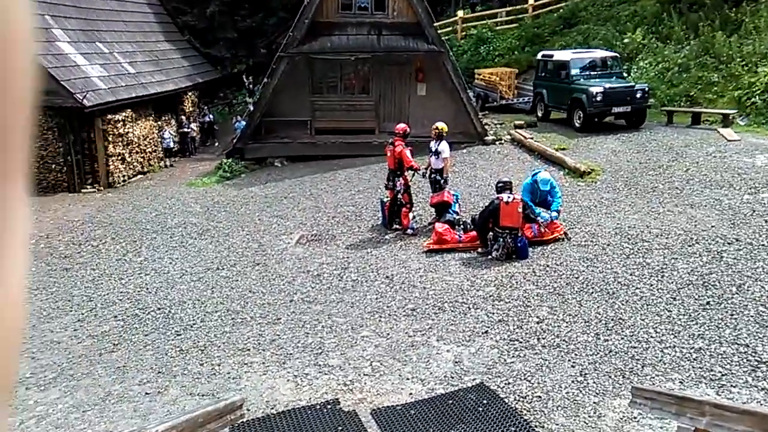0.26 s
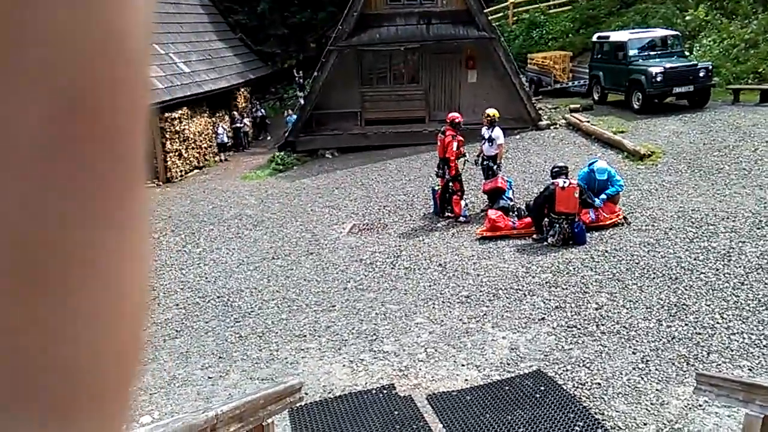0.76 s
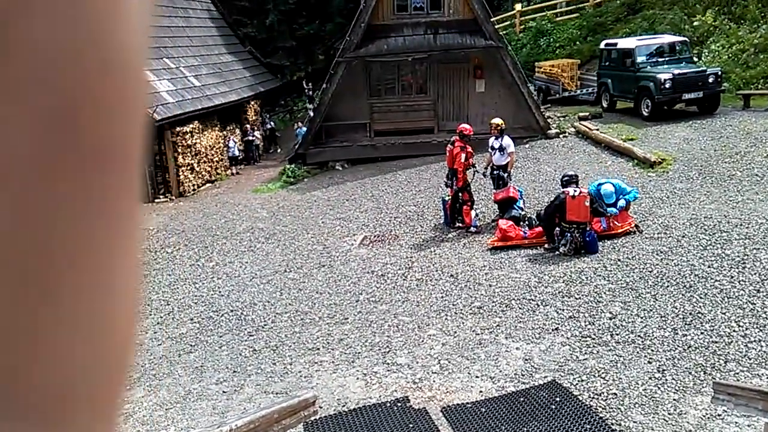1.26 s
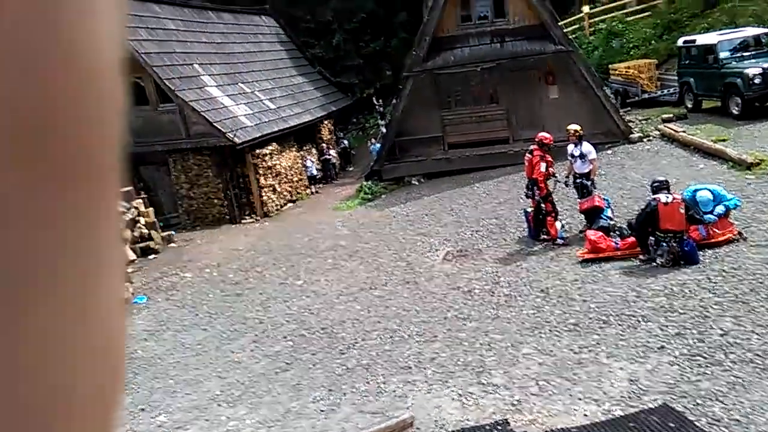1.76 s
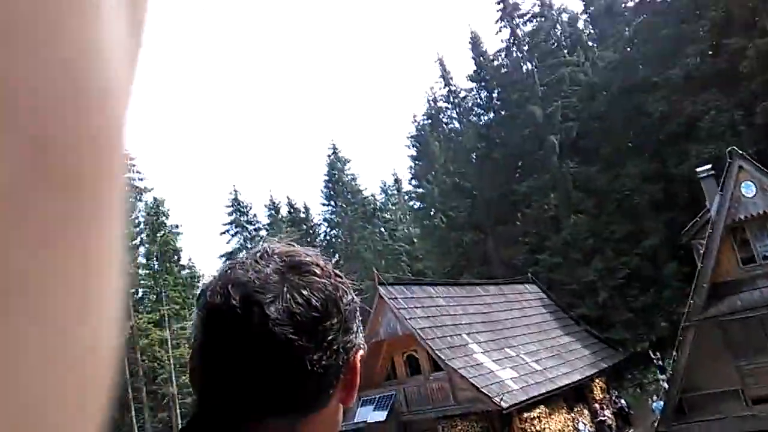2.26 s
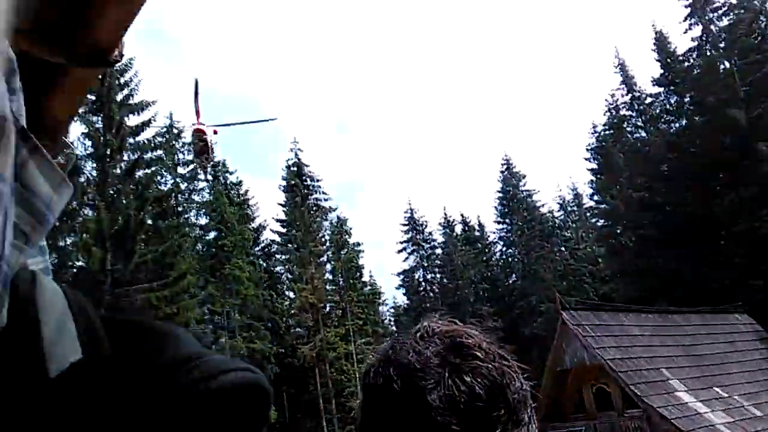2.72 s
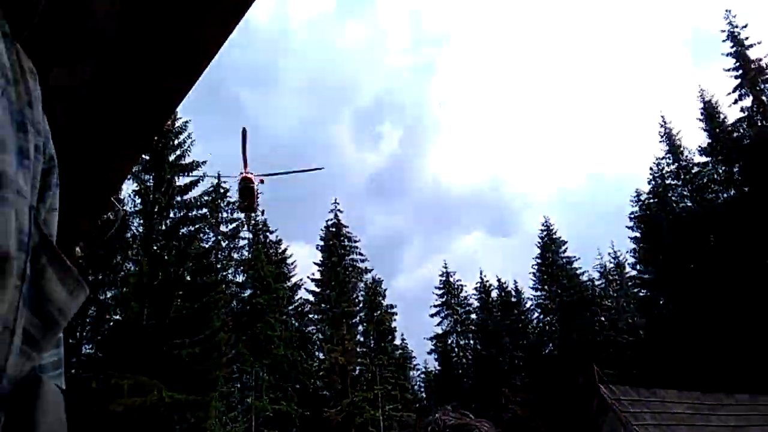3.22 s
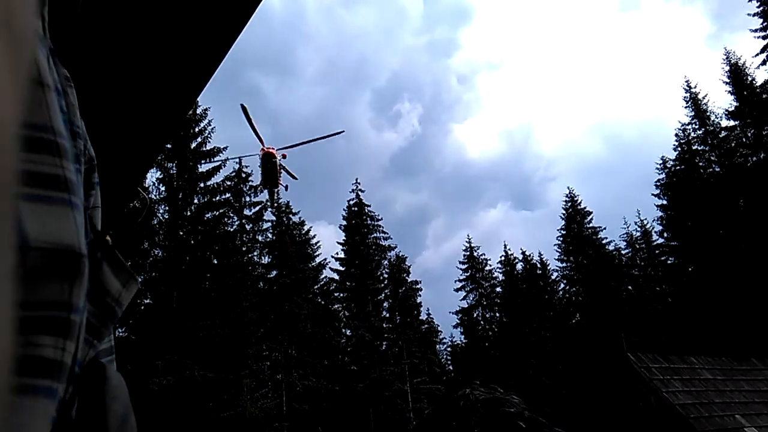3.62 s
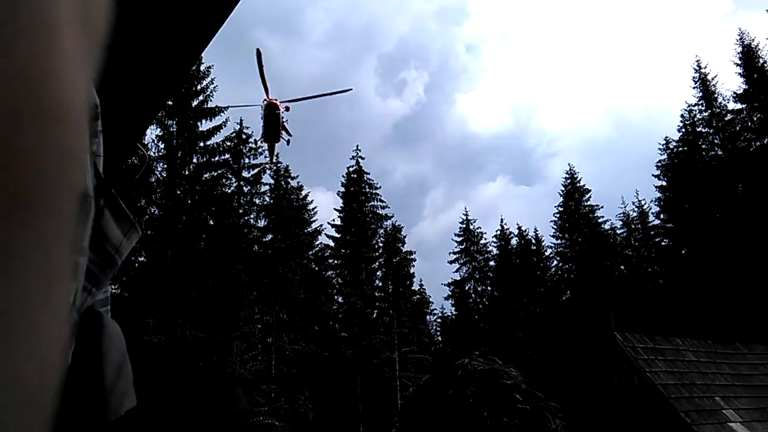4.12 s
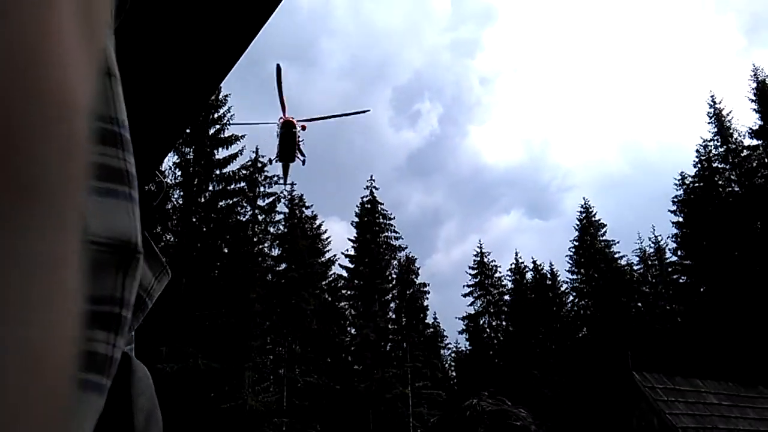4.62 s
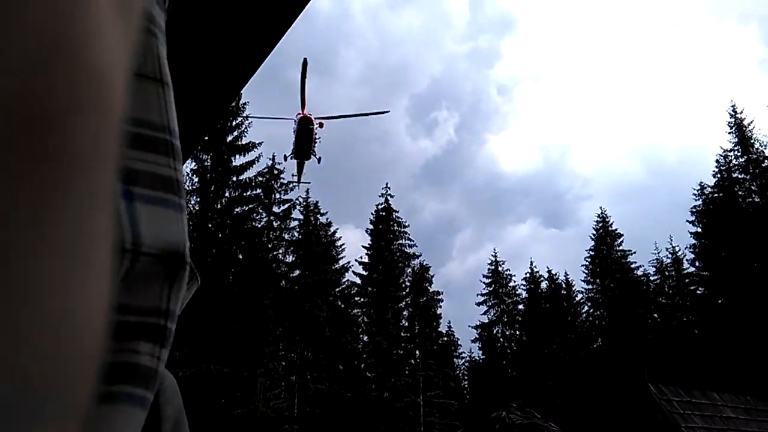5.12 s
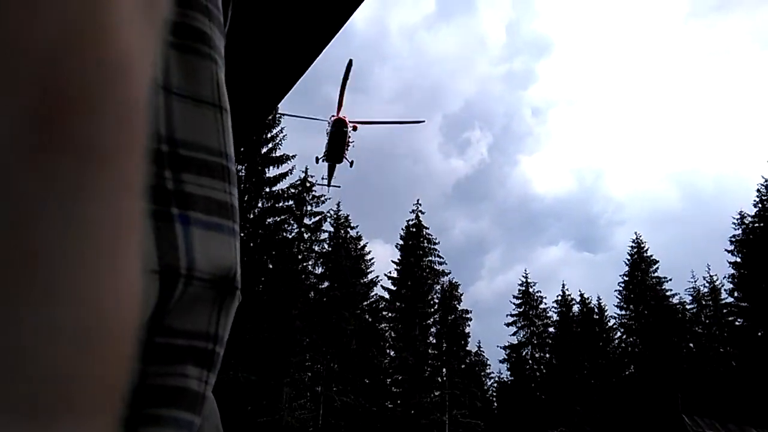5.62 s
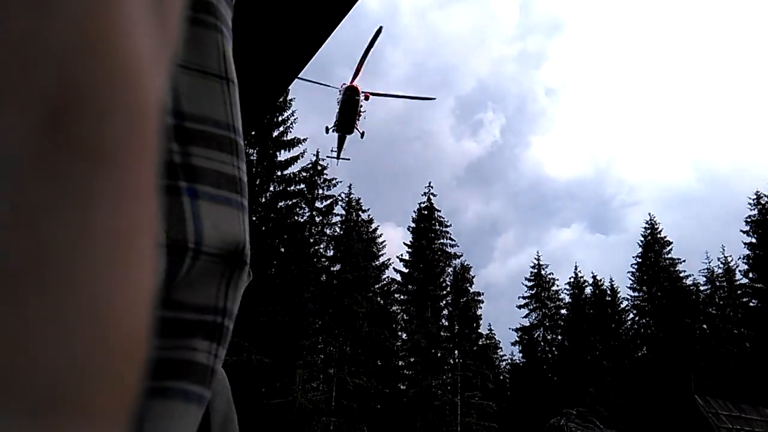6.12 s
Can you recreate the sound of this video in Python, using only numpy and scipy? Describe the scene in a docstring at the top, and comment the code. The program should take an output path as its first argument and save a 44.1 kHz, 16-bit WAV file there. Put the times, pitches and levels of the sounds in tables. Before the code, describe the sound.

A hovering helicopter heard through partly covered handheld microphones. At first the sound is dull and boomy, with stuttering dropouts and soft thumps on the right. Around three seconds a finger slips off and the left side opens abruptly into full roar, rapid chopping swishes and whistling whine. It grows as the aircraft approaches, partly muffled again by pressing fingers, with a sharp skin creak near the end.

```python
"""Forest clearing: a helicopter hangs back, then moves in; rotor drone, swishing and slapping blades, whine.
Rotors are harmonic sines, blade turbulence and slap are pulsed noise, gears and turbine are narrow tones.
Fingers partly cover two hand-held microphones, as filters that change with time: the left is sealed at
first and then bursts open; the right is squeezed and cuts out in short, thumping gaps. Fingers creak."""
import sys
import numpy as np
from scipy import signal
from scipy.fft import rfft, irfft
from scipy.io import wavfile
from scipy.ndimage import uniform_filter1d, minimum_filter1d

SR = 44100
rng = np.random.default_rng(int(sys.argv[2]) if len(sys.argv) > 2 else 0)


def store_wav(level_fs):
    """Save 16-bit WAV to argv[1]."""
    pcm = np.round(np.clip(np.atleast_2d(level_fs), -1, 1) * 32767)
    wavfile.write(sys.argv[1], SR, pcm.T.astype(np.int16))


N = 280917
TIME, BINS = np.arange(N) / SR, np.fft.rfftfreq(N, 1 / SR)


def gain_of(db):
    """Decibels to amplitude."""
    return 10 ** (np.asarray(db) / 20)


def evened(x):
    """Scales to an rms of 1."""
    return x / np.sqrt(np.mean(x ** 2) + 1e-20)


def over_time(rows, t=TIME):
    """Each column of a curve table at the times t."""
    s, *columns = np.transpose(rows)
    return [np.interp(t, s, c) for c in columns]


def over_pitch(rows, hz=BINS):
    """Each column of a spectrum table, on a log-frequency axis."""
    f, *columns = np.transpose(rows)
    return [np.interp(np.log(hz + 1), np.log(f + 1), c) for c in columns]


def noise(shape):
    """Noise of rms 1 with the given magnitude spectrum."""
    return evened(irfft(rfft(rng.standard_normal(N)) * shape, N))


def drift(rate_hz):
    """Slow random curve of rms 1, Gaussian low-pass at rate_hz."""
    return noise(np.exp(-.5 * (BINS / rate_hz) ** 2))


def band(hz, half_width_hz):
    """Narrow-band noise: a fuzzy whistle."""
    return noise(1 / (1 + ((BINS - hz) / half_width_hz) ** 2))


def ramp(t, start_s, length_s):
    """Raised-cosine step from 0 to 1."""
    return .5 - .5 * np.cos(np.pi * np.clip((t - start_s) / length_s, 0, 1))


# main blade passing rate: (time [s], rate [passes/s])
MAIN_BLADE_RATE = [(0, 18.09), (1, 18.16), (2.6, 18.16), (3.6, 18.10), (4.6, 18.12), (5.4, 18.01),
                   (6.37, 17.88)]


def blade_rate_hz():
    """Main blade passes per second."""
    return over_time(MAIN_BLADE_RATE)[0]


def blade_pulse(turns, rise, fall, spread_db):
    """A swell at each blade pass, each of its own strength; rise and fall in blade periods."""
    blade, since = (turns // 1).astype(int), turns % 1
    size = gain_of(spread_db * rng.standard_normal(256))
    decay = size[blade] * np.exp(-since / fall)
    onset = size[blade + 1] * np.exp((since - 1) / rise)
    return evened(decay + onset)


# skin slips on plastic, left microphone: (time [s], peak level [dB])
CREAK_TIMES = [(2.279, -44.5), (2.859, -39), (6.036, -4), (6.094, -15)]


def creaks(decay_s=0.01):
    """Skin slipping on plastic: brief bright scratches, sudden onset, exponential decay."""
    envelope = sum(gain_of(db) * (TIME >= s) * np.exp(-abs(TIME - s) / decay_s) for s, db in CREAK_TIMES)
    scratch = noise(BINS / (BINS ** 2 + 3500 ** 2))
    return envelope * scratch / abs(scratch).max()


# colour of blade turbulence: (frequency [Hz], relative density [dB per Hz])
ROAR_COLOUR = [(25.0, -9), (50.0, -63), (105.0, -12), (180.0, -2), (260.0, -7), (470.0, 1.5), (680.0, -6),
               (1100.0, -7.5), (1500.0, -13.5), (2000.0, -11), (2600.0, -16.5), (3300.0, -18.5),
               (3900.0, -27.5), (6800.0, -39.5), (10200.0, -43), (11100.0, -37.5), (12500.0, -47),
               (14200.0, -49)]
# part of the roar that comes in swishes: (frequency [Hz], share of power [0-1])
SWISH_SHARE = [(100, 0), (450, 0.25), (1000, 0.53), (1900, 0.57), (3000, 0.59), (6000, 0.7), (11000, 0.1)]
ROAR_DB = -10


def roar(swish, grain_db=2.5, echo=0.23):
    """Steady turbulence plus a gritty swish per blade; a shifting ground echo ripples the colour."""
    high_pass = BINS ** 2 / (BINS ** 2 + 20 ** 2)
    colour = gain_of(over_pitch(ROAR_COLOUR)[0]) * high_pass
    share = np.clip(over_pitch(SWISH_SHARE)[0], 0, 1)
    bursts = evened(swish * gain_of(grain_db * drift(320)) * rng.standard_normal(N))
    steady = rng.standard_normal(N)
    air = irfft(colour * (np.sqrt(share) * rfft(bursts) + np.sqrt(1 - share) * rfft(steady)), N)
    delay_s = .0105 + 0.000488 * drift(0.643)
    return gain_of(ROAR_DB) * evened(air + echo * np.interp(TIME - delay_s, TIME, air))


# gears and compressor: (frequency [Hz], full width at half amplitude [Hz], level [dB])
GEAR_WHINES = [(1000, 22, -34), (1922, 33, -34.5), (4200, 60, -47), (11070, 130, -48)]


def gear_whine():
    """Gears and compressor: steady narrow noise bands."""
    return sum(gain_of(db) * band(hz, width_hz / 2) for hz, width_hz, db in GEAR_WHINES)


# the whistle beams past once as the aircraft turns
WHISTLE_BEAM_DB, WHISTLE_BEAM_S, WHISTLE_WIDTH_S = 7, 3.88, 0.93
OVERHEAD_S, OVERHEAD_DB_PER_S = 4.6, 1


def whistle_beam_db():
    """Rise of the whistle as its beam passes, a Gaussian in time."""
    return WHISTLE_BEAM_DB * np.exp(-((TIME - WHISTLE_BEAM_S) / WHISTLE_WIDTH_S) ** 2)


def body_shadow():
    """Coming overhead, the body hides the turbine tone and the whistle."""
    return gain_of(-OVERHEAD_DB_PER_S * np.maximum(TIME - OVERHEAD_S, 0))


# the turbine beams at the listener at first, then turns away
TURBINE_DB, TURBINE_BEAM_DB, TURBINE_TURN_S = -34.5, 13.5, 0.35
TURBINE_SHARE = 0.46  # of the whistle's beaming


def turbine(tone_hz=2853, wander_hz=7):
    """Turbine: one sine whose pitch wanders slightly."""
    db = TURBINE_DB + TURBINE_BEAM_DB * np.exp(-TIME / TURBINE_TURN_S) + TURBINE_SHARE * whistle_beam_db()
    phase = 2 * np.pi * np.cumsum(tone_hz + wander_hz * drift(13.8)) / SR
    return body_shadow() * gain_of(db) * np.sqrt(2) * np.sin(phase)


# the octave swells once, around 3 s
WHISTLE_DB, OCTAVE_DB = -34, -53
OCTAVE_SWELL_DB, OCTAVE_SWELL_S, OCTAVE_SWELL_WIDTH_S = 13, 3.07, 0.45


def blade_whistle(turns, whistle_hz=3050, jitter_hz=45, glide_hz=300):
    """Whistle on the blades with its octave; Doppler chirps it downward as each blade swings past."""
    octave_db = OCTAVE_DB + OCTAVE_SWELL_DB * np.exp(-((TIME - OCTAVE_SWELL_S) / OCTAVE_SWELL_WIDTH_S) ** 2)
    ahead = turns + .25  # chirp leads the swish
    chirp = blade_pulse(ahead, rise=0.021, fall=0.099, spread_db=2.5)
    doppler_hz = -glide_hz * ((ahead + .5) % 1 - .5)
    phase = 2 * np.pi * np.cumsum(whistle_hz + doppler_hz + jitter_hz * drift(64.0)) / SR
    whistle = gain_of(WHISTLE_DB + whistle_beam_db()) * np.sin(phase)
    octave = gain_of(octave_db) * np.sin(2 * phase)
    return body_shadow() * np.sqrt(2) * chirp * (whistle + octave)


# blade slap, strongest while the aircraft is behind the trees: (time [s], level [dB])
SLAP_LEVEL = [(0, -17), (.5, -15), (.85, -11), (1.8, -15.5), (3.3, -16), (3.45, -21), (4.8, -21.5),
              (5.1, -18.5), (6.37, -26.5)]
# humps in the colour of a slap: (frequency [Hz], relative level [dB])
SLAP_COLOUR = [(900, 1.5), (1220, 2), (1500, -3), (1820, 0), (2080, -3), (2500, -5)]


def slap(turns, half_width_hz=100, spread_db=4.5):
    """A knock as each blade meets the wake of the one before; humps vary singly, so colours differ."""
    def hump(hz, db):
        knock = blade_pulse(turns, rise=0.057, fall=0.17, spread_db=spread_db)
        return gain_of(db) * knock * band(hz, half_width_hz)
    return gain_of(over_time(SLAP_LEVEL)[0]) * evened(sum(hump(hz, db) for hz, db in SLAP_COLOUR))


# the ground echo lags more as the aircraft climbs in the sky
ECHO_S, ECHO_GROWTH_S_PER_S, ECHO_STRENGTH = 0.00625, .00064, 0.56
TAIL_RATIO = 3.944  # tail blade passes per main blade pass


def echo_delay_s():
    """Time by which the ground echo trails the direct sound."""
    return ECHO_S + ECHO_GROWTH_S_PER_S * TIME


# lowest tail rotor harmonics: (multiple [1], level before echo and beam [dB], share of beaming [1])
TAIL_LOW = [(1, -16.5, 1.15), (2, -20.5, 1.57), (3, -19, .15)]
# wavering tail rotor overtones: (multiple [1], level before beam [dB])
TAIL_HIGH = [(4, -30.5), (5, -30), (6, -28.5), (7, -24.5), (8, -37.5), (9, -42), (10, -47)]
# main rotor beat: (multiple [1], level [dB])
MAIN_HARMONICS = [(2, -42), (3, -36), (5, -39), (6, -35.5), (10, -39)]
# tail rotor beams toward and away as the aircraft turns: (time [s], level change [dB])
TAIL_BEAMING = [(.3, 5), (.6, 1), (2.5, -0.5), (3.6, 1), (5.3, -2.5), (6.0, -6)]
OVERTONE_SHARE = .6  # of the tail rotor's positive beaming


def drone(turns, waver_db=0.85, fade_db=2.0, wander_rad=1.0):
    """Rotor harmonics; ground echo combs the lowest, moving air makes higher ones fade and wander."""
    def partial(multiple, db, unrest_db):
        wander = wander_rad * unrest_db / fade_db * drift(3.35)
        phase = 2 * np.pi * (multiple * turns + rng.random()) + wander
        return np.sqrt(2) * gain_of(db + unrest_db * drift(3.9)) * np.sin(phase)

    def comb(k):
        return abs(1 + ECHO_STRENGTH * np.exp(1j * k * lag_rad))

    lag_rad = 2 * np.pi * TAIL_RATIO * blade_rate_hz() * echo_delay_s()
    beam_db = over_time(TAIL_BEAMING)[0]
    overtone_beam_db = OVERTONE_SHARE * np.maximum(beam_db, 0)
    low = sum(comb(round(k)) * partial(TAIL_RATIO * round(k), db + share * beam_db, waver_db)
              for k, db, share in TAIL_LOW)
    high = sum(partial(TAIL_RATIO * round(k), db + overtone_beam_db, fade_db) for k, db in TAIL_HIGH)
    beat = sum(partial(round(k), db, 2 * waver_db) for k, db in MAIN_HARMONICS)
    return low + high + beat


def covered(x, colour_db):
    """Time-varying filter: colour_db(Hz column, s row)."""
    hz, t, z = signal.stft(x, SR, nperseg=1024, noverlap=768)
    return signal.istft(z * gain_of(colour_db(hz[:, None], t)), SR, nperseg=1024, noverlap=768)[1][:N]


def press(t, start_s, closing_s, lets_go_s, easing_s):
    """A finger closes, holds and eases off: 0-1."""
    return ramp(t, start_s, closing_s) * (1 - ramp(t, lets_go_s, easing_s))


def pocket(rows, hz, t, half_width_hz):
    """Moving resonance of the air under a finger: 1 at its centre."""
    return 1 / (1 + ((hz - over_time(rows, t)[0]) / half_width_hz) ** 2)


# colour of covered ports:
# (frequency [Hz], left sealed [dB], left half covered at depth 1 [dB], right before grip [dB])
COVER_COLOUR = [(75, -22, 0, -6.5), (140, -27, -1, -15.5), (218, -34.5, -5, -18), (387, -39.5, -7, -21),
                (693, -41, -13, -29.5), (1155, -37.5, -17.5, -37.5), (1920, -44.5, -22.5, -38),
                (3200, -43, -26.5, -34.5), (5100, -43, -22.5, -26.5), (8000, -30.5, -18.5, -28),
                (11700, -22.5, -9, -29), (13900, -31, -13, -30)]
# left finger; presses add up, depth below 0 lifts clear:
# (start [s], closing [s], lets go [s], easing [s], depth [x half covered colour], gain [dB])
LEFT_FINGER = [(3.2, .1, 3.323, 0.19, 0.99, 3.5), (3.44, 0.18, 3.64, 0.14, -0.33, -5),
               (4.42, 0.11, 4.6, .15, -0.22, 6), (4.798, 0.079, 5.65, 0.45, 0.96, 0.4),
               (4.8, 0.07, 5.13, 0.23, 0.13, -0.9), (4.98, 0.094, 5.13, 0.15, 0.02, -5),
               (5.53, 0.11, 5.51, 0.16, 0.24, -5.5)]
# air pocket under the left finger, shifts with the grip: (time [s], resonance [Hz])
LEFT_RESONANCE = [(.9, 1250), (1.4, 1730), (2.0, 1780), (2.75, 1480), (3.3, 1260)]
# the seal leaks before it slips: (frequency [Hz], level change [dB])
SEAL_LEAK = [(200, -0.5), (420, 6.5), (900, -3), (3000, 1), (5500, -4.5)]
LEAK_S, LEAK_LENGTH_S = 1.88, 0.64
SLIP_S, SLIP_LENGTH_S = 3.335, 0.046
LEFT_POCKET_DB = 8.5


def left_cover(hz, t):
    """The finger seals the left port, leaks, slips off, then covers it in part by several presses."""
    sealed_db, half_db, _ = over_pitch(COVER_COLOUR, hz)
    free = ramp(t, SLIP_S, SLIP_LENGTH_S)
    pressed_db = sum(press(t, *timing) * (depth * half_db + db) for *timing, depth, db in LEFT_FINGER)
    leak_db = ramp(t, LEAK_S, LEAK_LENGTH_S) * over_pitch(SEAL_LEAK, hz)[0]
    pocket_db = LEFT_POCKET_DB * pocket(LEFT_RESONANCE, hz, t, half_width_hz=57)
    return (1 - free) * (sealed_db + leak_db + pocket_db) + free * pressed_db


# hand on the right port, loss below 0 loosens:
# (start [s], closing [s], lets go [s], easing [s], middle band loss [dB])
RIGHT_HAND = [(0.222, 0.59, 1.894, 1.22, 34), (3.0, 0.91, 3.58, 0.1, -3.5), (3.58, 0.092, 4.42, 0.5, 6)]
# air pocket under the right finger, shifts with the grip: (time [s], resonance [Hz])
RIGHT_RESONANCE = [(.4, 750), (.8, 1140), (1.5, 1196), (1.95, 1560), (2.85, 1430), (6.37, 1710)]
LOOSE_DB, CREEP_DB_PER_S = 5.5, 1.88  # loose grip creeps shut
BASS_DB, BASS_SHARE, TREBLE_DB, TREBLE_SHARE = 2, 0.54, 1.5, 0.19  # shares of the grip
RIGHT_POCKET_DB, POCKET_SHARE = 10.5, 0.049  # tighter grip rings harder, dB per dB


def right_cover(hz, t):
    """The right port stays muffled; a tighter grip shuts out the middle band most."""
    squeeze_db = sum(db * press(t, *timing) for *timing, db in RIGHT_HAND)
    grip_db = LOOSE_DB - CREEP_DB_PER_S * t - squeeze_db
    low, high = 1 / (1 + (hz / 240) ** 4), 1 / (1 + (950 / (hz + 1)) ** 3)
    bass_db = low * (BASS_DB + BASS_SHARE * grip_db)
    treble_db = high * (TREBLE_DB + TREBLE_SHARE * grip_db)
    middle_db = (1 - low - high) * grip_db
    ring = pocket(RIGHT_RESONANCE, hz, t, half_width_hz=123)
    pocket_db = (RIGHT_POCKET_DB - POCKET_SHARE * grip_db) * ring
    return over_pitch(COVER_COLOUR, hz)[2] + bass_db + treble_db + middle_db + pocket_db


# finger pressure pins the right diaphragm: (start [s], end [s], relative thump level [dB])
PINNED_SPANS = [(0.346, 0.366, -27), (0.381, 0.411, -31), (0.541, 0.589, -24), (0.605, .676, -16),
                (0.684, 0.743, -18), (0.766, .807, -25.5), (0.902, 0.93, -34), (1.605, 1.627, -29),
                (1.774, 1.827, -24), (1.848, 1.93, -25), (1.94, 1.992, -19), (2.014, 2.056, -24),
                (2.07, 2.121, -21), (2.143, 2.183, -26.5), (2.209, 2.233, -26.5), (2.275, 2.3, -25),
                (2.331, 2.356, -27), (2.586, 2.61, -24)]
RELEASE_DB = 0.5  # release thump against stop thump


def pinned(x, ring_hz=52, ring_s=0.013):
    """A pinned diaphragm passes no sound; stop and release kick the bass filter opposite ways."""
    free, kicks = np.ones(N), np.zeros(N)
    for start_s, end_s, db in PINNED_SPANS:
        a, b = round(start_s * SR), round(end_s * SR)
        free[a:b] = 0
        kicks[[a, b]] = -gain_of(db), gain_of(db + RELEASE_DB)
    t = TIME[:SR // 5]
    onset = 1 - np.exp(-t / 0.0008)
    ring = np.exp(-t / ring_s) * np.cos(2 * np.pi * ring_hz * t + np.pi / 4) * onset
    bass_filter = signal.butter(2, 35, "high", fs=SR, output="sos")
    passed = signal.sosfilt(bass_filter, x * uniform_filter1d(free, size=40))
    return passed + 2 * signal.oaconvolve(kicks, ring)[:N]


FIRST_PASS = .66  # blade periods elapsed at the start
APPROACH_S, APPROACH_DB_PER_S = 4.13, 1.66  # hangs back, then moves in


def scene():
    """Both microphones share drone, blade rhythm and low roar; fine turbulence differs between them."""
    turns = FIRST_PASS + np.cumsum(blade_rate_hz()) / SR
    near = gain_of(APPROACH_DB_PER_S * np.maximum(TIME - APPROACH_S, 0))
    swish = blade_pulse(turns, rise=0.084, fall=0.45, spread_db=1.0)

    def air():
        whine = gear_whine() + turbine() + blade_whistle(turns)
        return near * (roar(swish) + slap(turns)) + whine

    left_air, other_air = air(), air()
    alike = 1 / (1 + (BINS / 1400) ** 2)
    right_air = irfft(alike * rfft(left_air) + np.sqrt(1 - alike ** 2) * rfft(other_air), N)
    hum = near * drone(turns)
    late = np.interp(TIME - 6 / SR, TIME, hum + left_air)  # reaches the left port 6 samples later
    ease_in = np.minimum(TIME / .006, 1)
    left = covered(ease_in * late, left_cover) + creaks()
    right = pinned(covered(ease_in * (hum + right_air), right_cover))
    return np.array([left, right])


EDGE_HZ = 14300


def record(dry, ceiling=0.79):
    """A fast limiter holds the peaks of each channel; then a low-pass at EDGE_HZ."""
    room = np.minimum(1, ceiling / (abs(dry) + 1e-9))
    gain = uniform_filter1d(minimum_filter1d(room, size=200, axis=1), size=200, axis=1)
    low_pass = signal.firwin(511, EDGE_HZ, window=("kaiser", 9), fs=SR)
    return signal.oaconvolve(dry * gain, low_pass[None], "same")


dry = scene()
out = record(dry)
store_wav(out)
```